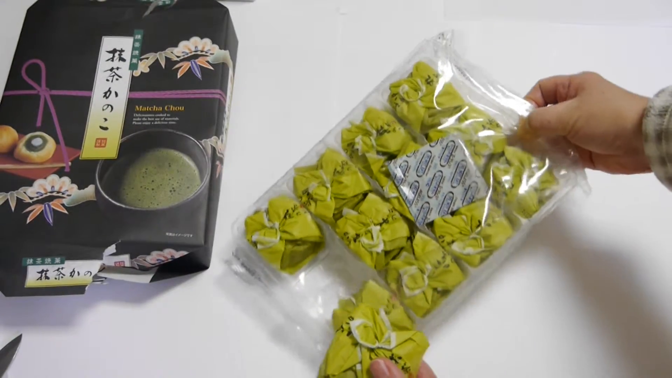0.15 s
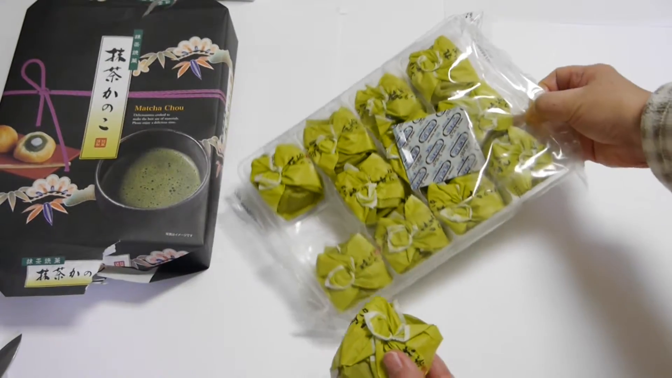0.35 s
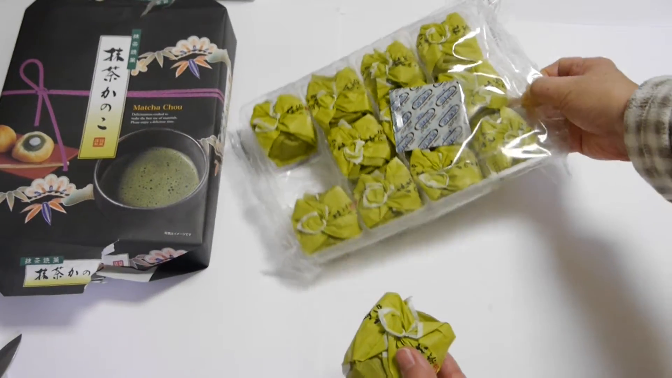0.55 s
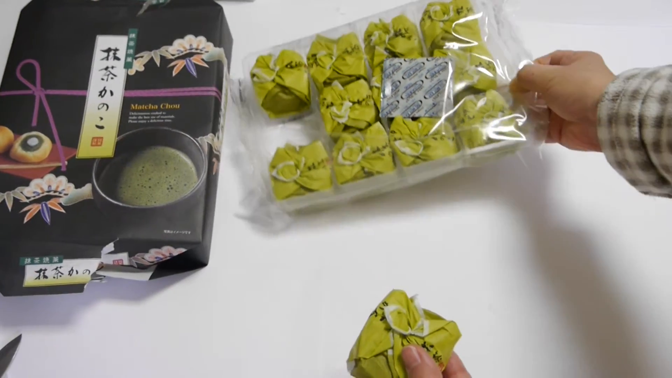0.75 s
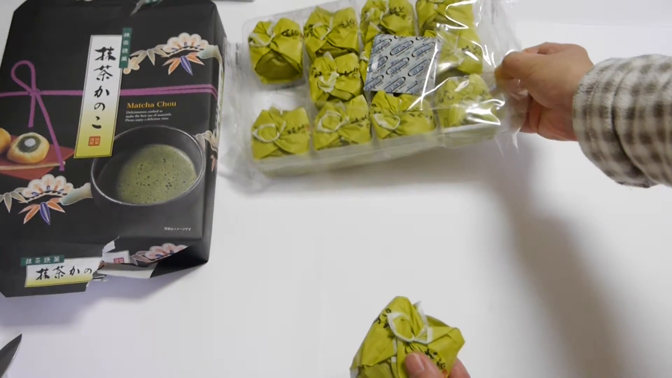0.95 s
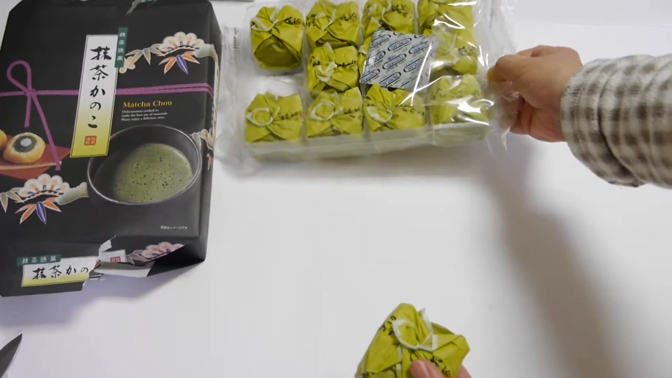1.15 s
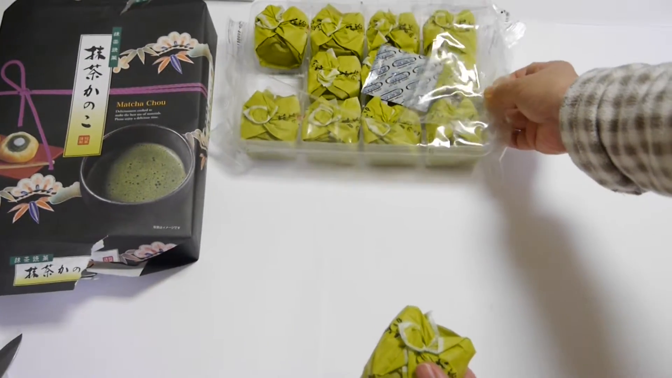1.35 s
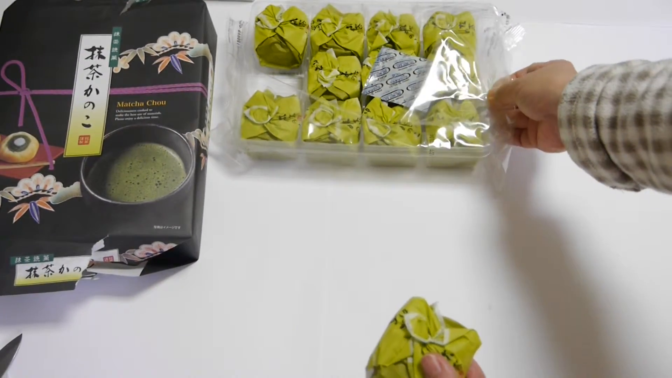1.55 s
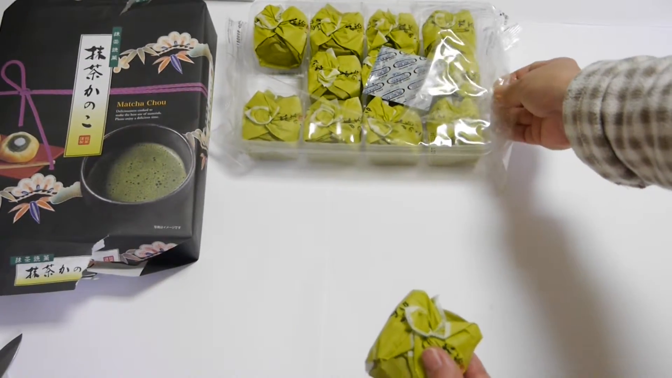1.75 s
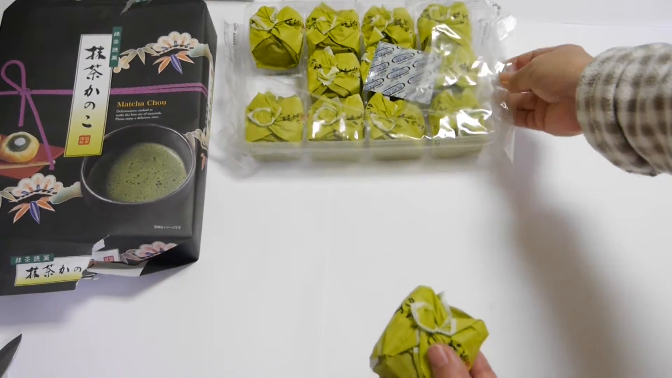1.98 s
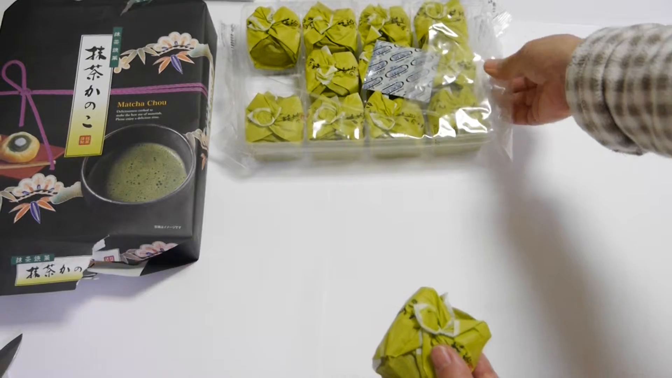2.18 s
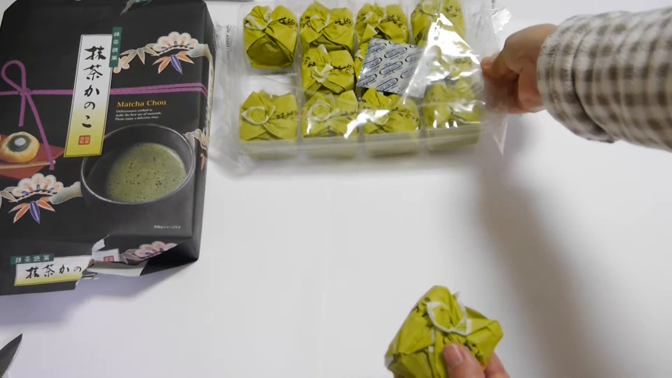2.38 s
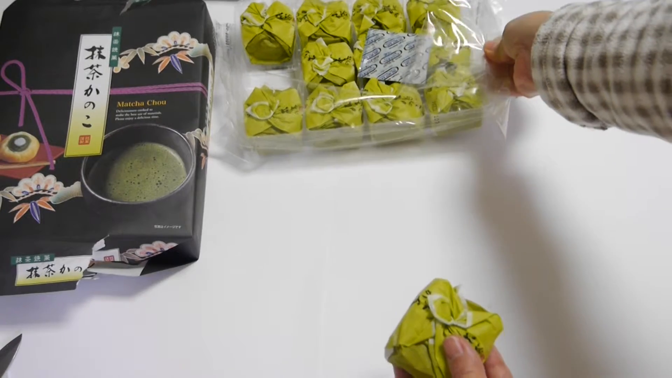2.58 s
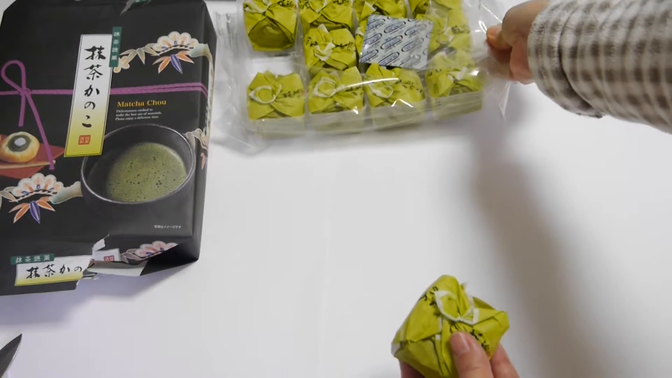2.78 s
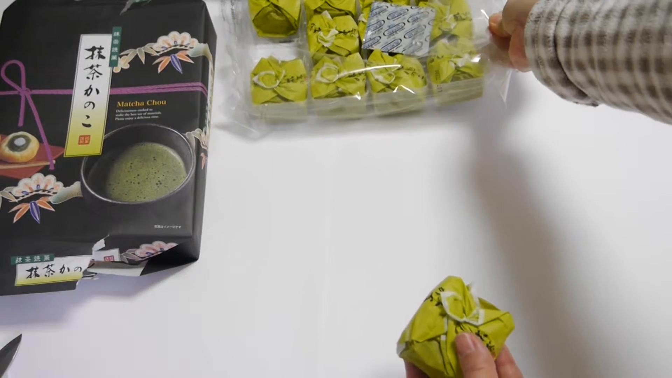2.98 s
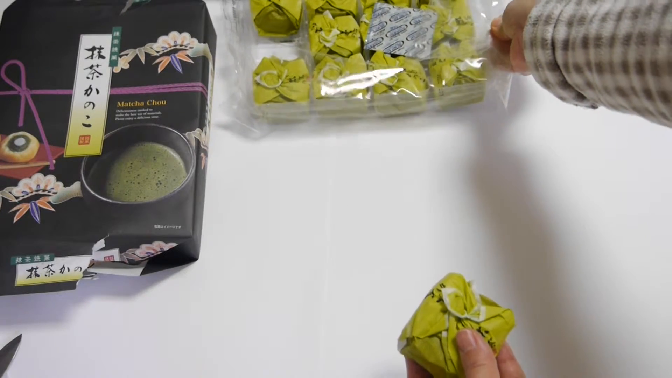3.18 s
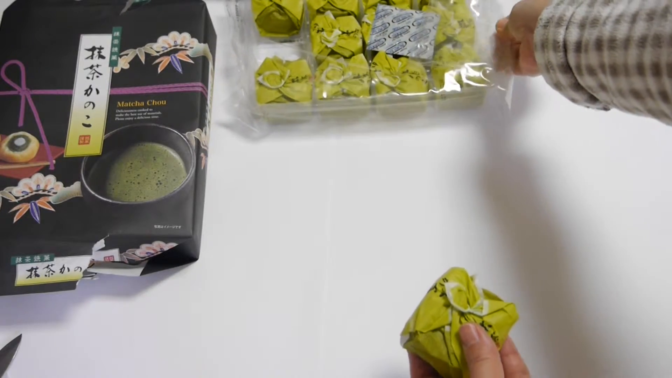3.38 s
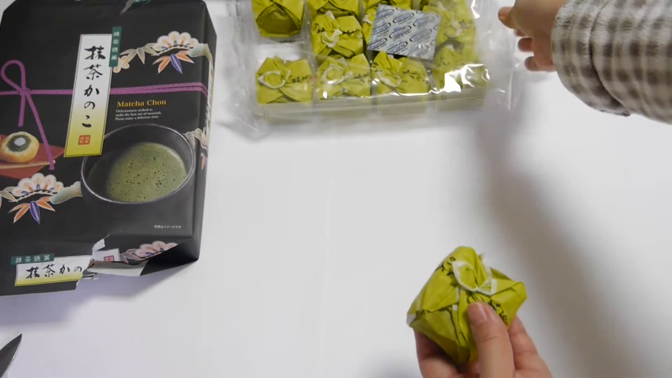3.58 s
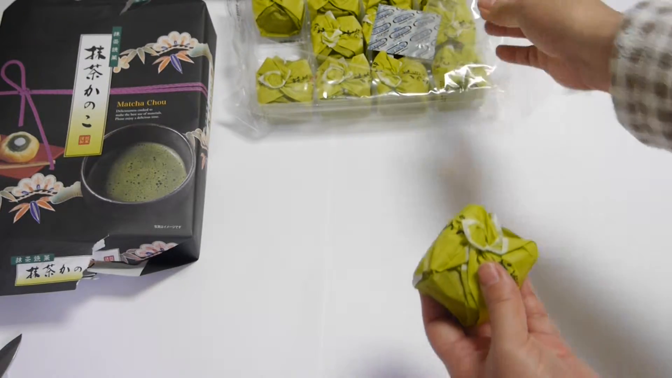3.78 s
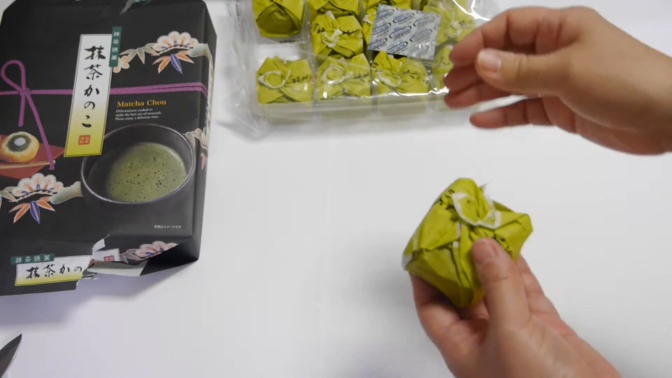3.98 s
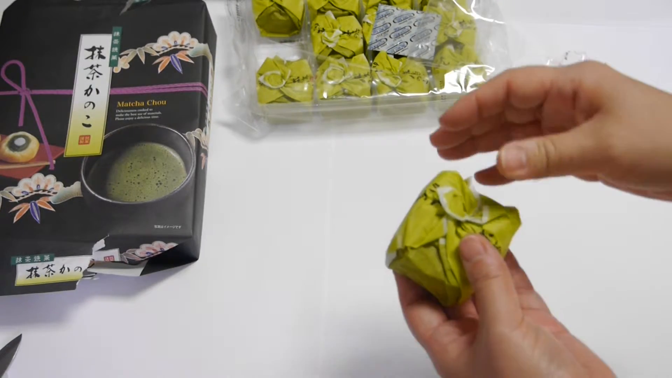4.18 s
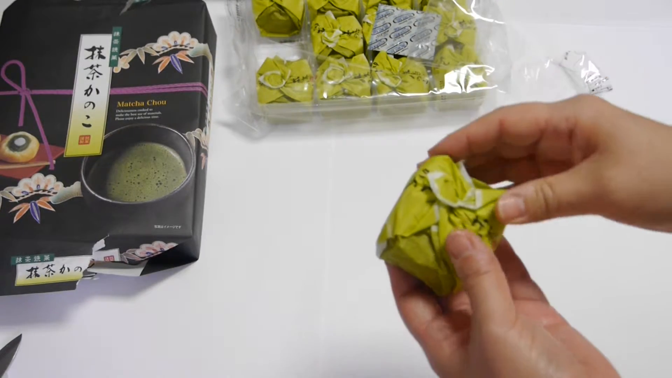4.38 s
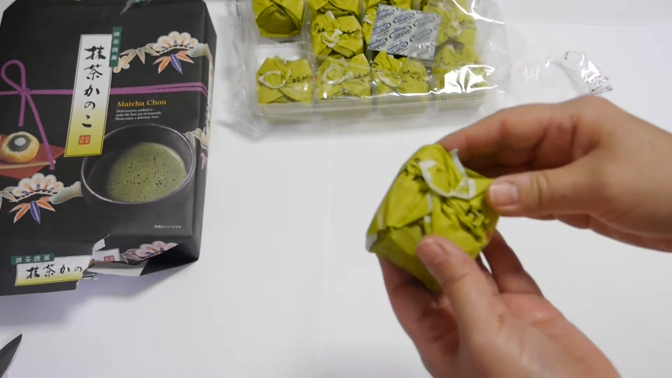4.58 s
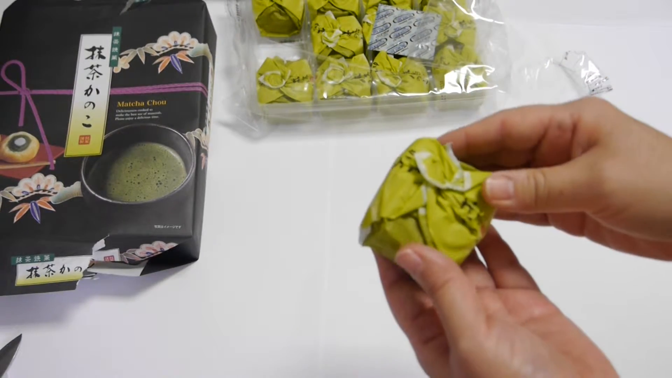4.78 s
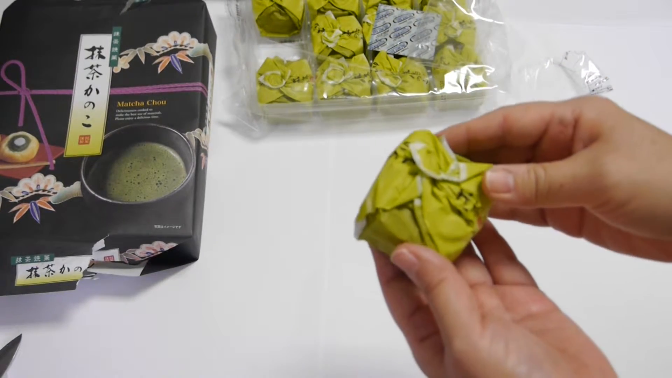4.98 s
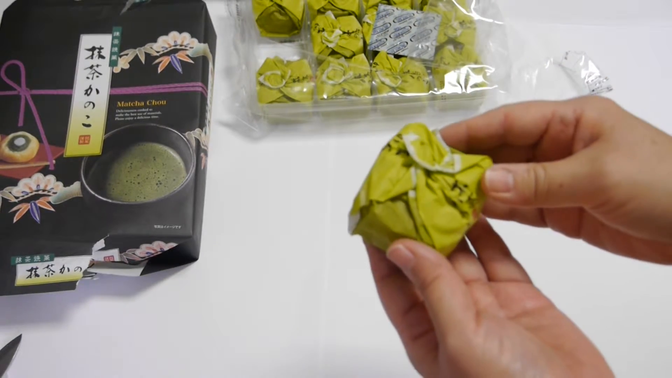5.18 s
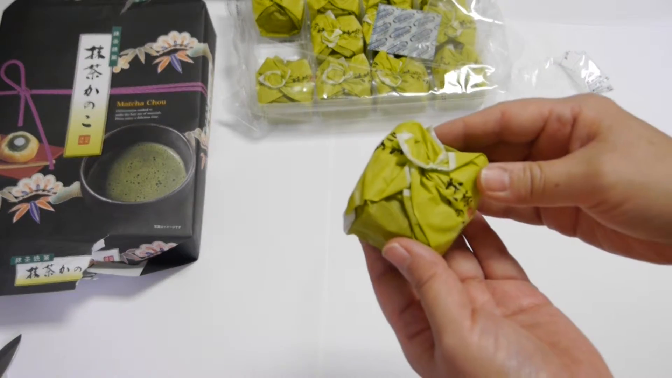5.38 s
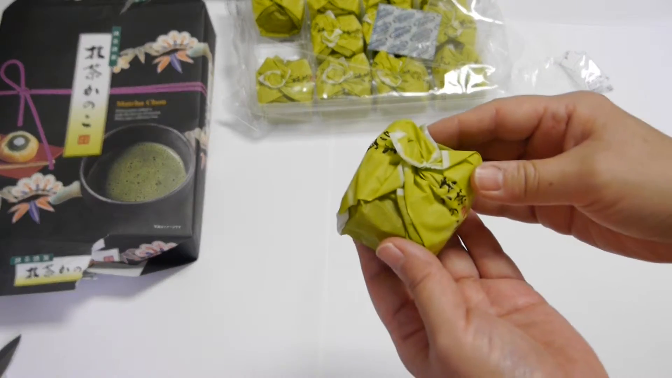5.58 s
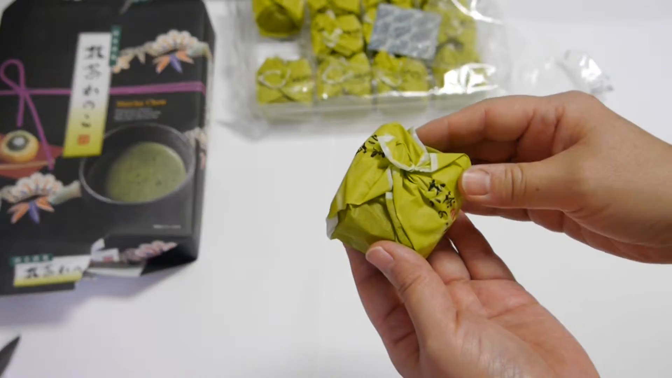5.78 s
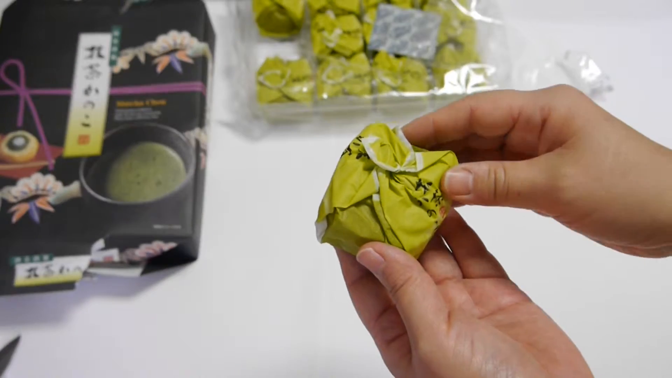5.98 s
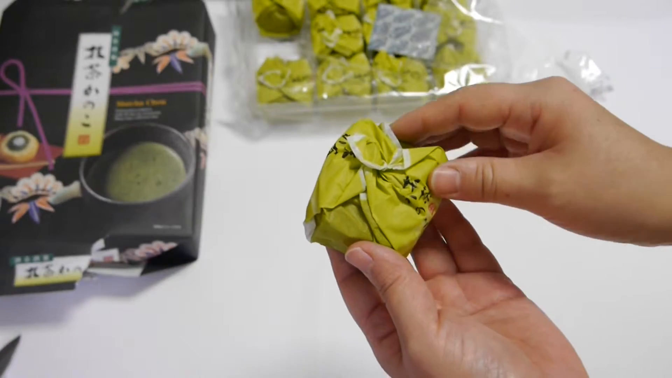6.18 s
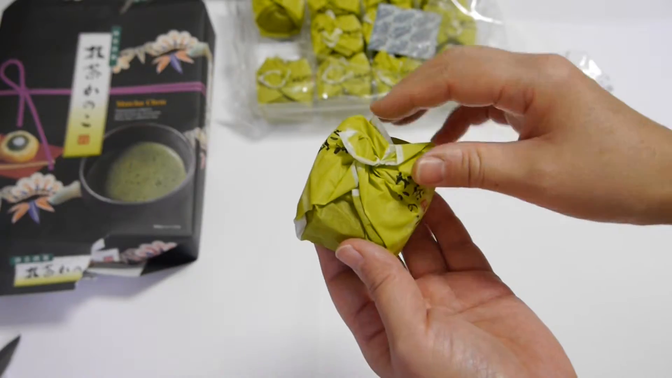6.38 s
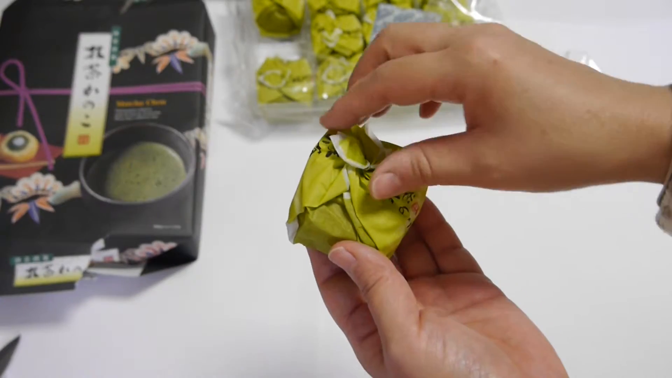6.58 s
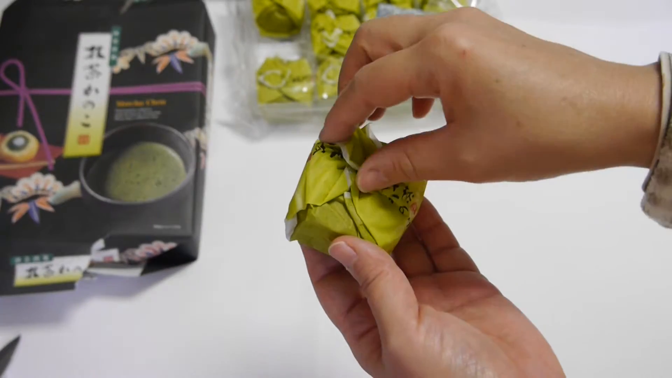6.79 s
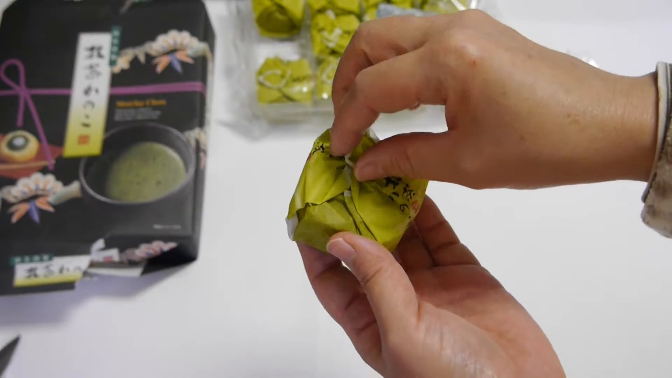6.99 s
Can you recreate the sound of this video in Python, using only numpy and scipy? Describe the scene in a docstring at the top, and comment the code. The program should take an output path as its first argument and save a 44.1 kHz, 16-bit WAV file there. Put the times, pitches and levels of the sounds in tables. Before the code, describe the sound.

A close stereo pickup in a small, slightly live room, with a soft low rush throughout. From 0 s a thin film bag on a plastic tray crackles finely, with one strong snap at 0.26. From 0.5 to 1.2 it slides over the table in two hissing swells, around 0.6 and 0.95, with dull hollow tray knocks near 0.6 and 1.1. A dense cluster of crackle, pops and knocks comes at 1.3-1.7. Scattered flexes and snaps follow, the sharpest at 2.76 with a tray knock, another at 2.84. Softer rustles and bumps run from 3.0 to 3.9, under a faint low hum swelling around 3-4. The bag is released near 3.9; a tiny bump comes at 4.2. Sparse, quiet wrapper crinkles occur at 4.5-5.3, then from 6.0, growing crisper and busier from 6.65 to the end. A barely audible thin whine fades in after 5.4.

```python
"""A hand stirs a thin film bag on a plastic tray of sweets, then pushes it across a table and lets go.
The film hisses as it slides, crackles as it flexes and snaps where a crease flips over; the hollow tray
knocks now and then. Later, fingers crinkle one wrapped sweet while a thin whine fades in.
Each film sound is a shower of tiny buckles, filtered; each snap or knock is a smeared click that rings.
A small room answers throughout over a low steady rush, and a faint hum swells midway.
"""
import sys
import numpy as np
from scipy import signal
from scipy.fft import rfft, irfft
from scipy.io import wavfile

SR = 44100
rng = np.random.default_rng(int(sys.argv[2]) if len(sys.argv) > 2 else 0)


def dump(signal):
    """Clip the signal to [-1, 1] and save it as 16-bit WAV at the path in sys.argv[1]."""
    limited = np.clip(np.atleast_2d(signal).T, -1, 1)
    pcm = np.round(limited * 32767).astype(np.int16)
    wavfile.write(sys.argv[1], SR, pcm)


N = 310905
TIME = np.arange(N) / SR

# The bag sliding across the table, before the layer balance: time_s, level_db
SLIDE_LEVEL = [(0.491, -64), (.515, -47.5), (.61, -44.5), (.72, -51), (.87, -52), (.9, -46), (.99, -45),
               (1.06, -51), (1.135, -50), (1.201, -72)]
# The hand flexing the bag, before the layer balance:
# start_s, length_s, wide_panel_level_db, small_facets_above_that_db
FLEXES = [(0, 0.13, -58, 6), (0.125, 0.41, -62.5, 13), (1.291, 0.1, -51, 9), (1.368, 0.15, -42, -3),
          (1.858, 0.14, -51.5, -2.5), (2.352, 0.17, -48, -3), (2.413, 0.023, -52.5, 12),
          (2.505, 0.18, -51.5, 0), (2.674, 0.43, -60, 8.5), (3.283, 0.21, -53.5, -11),
          (3.489, 0.14, -49.5, -6), (3.727, 0.15, -57.5, 8), (3.906, 0.1, -62.5, 2)]
# Relative spectra of the small facets, the wide panels and the dragging tray: frequency_hz, density_db_per_hz
FACET_SPECTRUM = [(1500, -25), (3000, -18.5), (4500, -9), (6500, 0), (8500, 0.5), (11000, -1.5),
                  (13000, -0.5), (16000, -7)]
PANEL_SPECTRUM = [(300, -40), (650, -9.5), (1000, 1.5), (1400, 2), (1900, -0.5), (2500, 0), (3700, -1.5),
                  (6000, -6.5), (12000, -33)]
DRAG_SPECTRUM = [(60, -32.5), (150, -9.5), (260, -3), (380, 0.5), (550, -1.5), (800, -2.5), (1300, -28.5),
                 (4000, -69)]
# Creases flipping over: start_s, panel_level_db, panel_pitch_hz, tick_level_db
SNAPS = [(.085, -16, 1370, -41), (0.185, -13, 2300, -31), (0.2597, 9, 1220, -9.5), (0.938, -8, 1740, -20),
         (1.123, -8.5, 1290, -18), (1.2843, -16, 397, -17), (1.331, -11.5, 3050, -23),
         (1.3522, -19, 4500, -15), (1.371, -7, 800, -11), (1.4049, 2.5, 796, -15), (1.435, -3, 570, -9.5),
         (1.4782, 3, 1010, -7), (1.4805, -9, 1000, -7.5), (1.559, -9, 1500, -15), (1.575, 1.5, 1480, -11.5),
         (1.6788, 9.5, 1450, -9), (1.8583, -6, 4800, -4.5), (1.9485, -8.5, 1420, -20),
         (2.0383, -12.5, 2950, -40), (2.2033, -29, 5200, -21), (2.3388, -6.5, 1500, -14.5),
         (2.4318, -10, 1400, -21), (2.4622, -4.5, 1110, -22), (2.541, -9.5, 1080, -19),
         (2.58, -7, 500, -10), (2.583, -5, 500, -14), (2.7187, -7.5, 1510, -19), (2.7573, 11, 670, -1),
         (2.8432, 5.5, 746, -8), (2.882, -12, 647, -13.5), (2.9528, -11.5, 1200, -37),
         (3.2334, -19, 2340, -42), (3.3327, -13, 2470, -22), (3.3864, -14, 1480, -27),
         (3.4361, -10, 1090, -15.5), (3.492, -6.5, 1500, -26), (3.5388, -12, 1400, -12.5),
         (3.5965, -13, 900, -15), (3.688, -14.5, 790, -24.5), (3.923, -10, 494, -23),
         (4.2555, -24, 500, -33.5), (4.585, -22, 3500, -34), (6.0372, -7, 1210, -15),
         (6.0772, -15, 1300, -30), (6.366, -7.5, 1230, -17.5), (6.455, -16.5, 4960, -26.5),
         (6.514, -21, 5000, -26), (6.64, -17.5, 2480, -34), (6.7724, -27, 4450, -39),
         (6.7969, -20, 3800, -14.5), (6.8032, -5, 4540, -18), (6.8544, -9.5, 500, -20),
         (6.8887, -22, 2300, -30), (7.01, -8, 1080, -19)]
# A flipping panel rings around its pitch and about an octave above: multiple_of_pitch, level_db
PANEL_RING = [(.1, -50), (.35, -19.5), (.65, -7.5), (.88, -0.5), (1.2, -1), (1.5, -8.5), (1.8, -2),
              (2.2, -5.5), (2.9, -11), (3.6, -12.5), (12, -46)]
# The tick of a crease: frequency_hz, level_db
TICK_SPECTRUM = [(40, -28), (130, -3), (500, -3.5), (1800, -2.5), (4000, 1), (6300, 2), (10500, 2.5),
                 (16000, -12.5)]
# The tray bumping and buckling, before the overall trim: start_s, level_db, pitch_hz, scuff_spread_s
KNOCKS = [(.601, -10, 1310, .008), (.647, -9.5, 1140, 0.0044), (0.652, -16, 433, 0.0067),
          (1.102, -18.5, 480, 0.015), (1.17, -21.5, 506, .025), (1.273, -22.5, 430, .01),
          (1.3086, -16, 710, 0.0014), (1.323, -19, 553, .002), (1.424, -6, 1240, .004),
          (1.440, -11, 594, .01), (1.466, -12.5, 1410, 0.00148), (1.467, -12, 500, 0.00306),
          (2.248, -22.5, 330, .025), (2.62, -27.5, 170, .015), (2.759, -11.5, 304, 0.0012),
          (3.045, -13.5, 690, 0.00281), (3.053, -10.5, 575, .006), (3.11, -26, 533, .0027),
          (3.601, -23.5, 194, 0.0075), (3.805, -19, 730, 0.0084), (3.862, -27.5, 320, 0.0045),
          (4.226, -27, 330, .0032)]
# Modes of the hollow tray: frequency_hz, width_hz, relative_level_db
TRAY_MODES = [(293, 53, -35), (427, 27, 6), (526, 68, 9), (639, 37, 3), (868, 28, -7.5), (1072, 270, 1),
              (1260, 76, -14), (1490, 26, -3.5)]
# Fingers pinching the wrapper, before the overall trim: start_s, length_s, level_db
PINCHES = [(4.51, 0.17, -56), (4.697, 0.1, -58.5), (4.88, 0.15, -61.5), (5.156, 0.14, -61.5),
           (6.02, 0.36, -64.5), (6.35, 0.089, -52), (6.435, 0.11, -53.5), (6.652, 0.061, -46),
           (6.7, 0.62, -51.5), (6.804, 0.068, -50), (6.918, 0.065, -45), (7.008, 0.098, -51)]
# Relative spectrum of the wrapper: frequency_hz, density_db_per_hz
WRAPPER_SPECTRUM = [(300, -29), (900, 6), (1500, -3), (2600, 0), (4000, 1), (6000, -0.5), (8000, 2.5),
                    (11000, -0.5), (13500, 3), (16000, -5)]
# The room's decay: frequency_hz, t60_s
ROOM_DECAY = [(200, 0.45), (800, 0.31), (2100, 0.33), (5500, 0.28), (10000, 0.3), (15000, 0.26)]
# Side level of the reflections: frequency_hz, level_db
ROOM_WIDTH = [(100, -8), (500, -7.5), (1200, -4.5), (5000, -6), (10000, -2)]
# Relative spectra of the room tone, common to both ears and opposed: frequency_hz, density_db_per_hz
TONE_MID = [(15, -40), (25, -20.5), (87, -7), (166, -5.5), (317, -2.5), (394, -3), (503, -8.5), (591, -9),
            (695, -12.5), (1700, -18.5), (2220, -22.5), (16000, -28)]
TONE_SIDE = [(15, -61), (25, -20), (111, -16), (195, -9.5), (270, -8.5), (887, -4.5), (1260, -6.5),
             (1650, -8), (2220, -14), (16000, -31.5)]
# Level of the room tone, before the mid and side balance: time_s, level_db
TONE_LEVEL = [(0, -56), (4.2, -58), (4.8, -57), (5.6, -59), (6.3, -58.5)]
# A faint low hum that swells for a while: time_s, level_db
HUM_LEVEL = [(2.5, -85), (2.9, -63.5), (3.6, -65), (4.3, -81)]
# A faint whine, one row: start_s, length_s, pitch_hz, peak_level_db
WHINE = (5.35, 4, 1690, -79)
# Microphone colour: frequency_hz, level_db
MIC_COLOUR = [(6000, -2.5), (8300, -5), (10300, 1.5), (12000, -5), (16000, -9)]
# Left minus right: frequency_hz, difference_db
MIC_LEAN = [(3000, -0.1), (8000, 0), (10500, -0.5), (13000, -4.5)]

HUM_HZ, EDGE_HZ = 76.5, 16100
LARGEST_BUCKLE_DB = 13  # above the smallest
LET_GO_S, TAKE_HOLD_S = 3.93, 4  # the hand starts to leave the bag; it takes the wrapped sweet


def slide(facets_db=2.0, panels_db=1.5, drag_db=-12, smooth=0.72):
    """The sliding bag hisses in its small facets and wide panels; the tray drags beneath."""
    times, levels_db = np.transpose(SLIDE_LEVEL)
    speed = amp(np.interp(TIME, times, levels_db, -np.inf, -np.inf))  # silent outside the slide
    facets = amp(facets_db) * rustle(FACET_SPECTRUM, smooth)
    panels = amp(panels_db) * rustle(PANEL_SPECTRUM, smooth)
    return speed * (facets + panels + amp(drag_db) * dragging())


def bag(facets_db=-2, panels_db=-1, drag_db=-4, held_facets_db=-66, held_panels_db=-63,
        held_drag_db=-61, release_s=0.083, smooth=0.72):
    """The bag stirs steadily while held; each flex makes it crackle and shifts the tray."""
    held = np.clip((LET_GO_S - TIME) / release_s + 1, 0, 1)
    wide = sum(amp(db) * swell(s, length) for s, length, db, _ in FLEXES)
    fine = sum(amp(db + bright_db) * swell(s, length) for s, length, db, bright_db in FLEXES)
    facet_level = np.hypot(amp(facets_db) * fine, amp(held_facets_db) * held)
    panel_level = np.hypot(amp(panels_db) * wide, amp(held_panels_db) * held)
    drag_level = np.hypot(amp(drag_db) * wide, amp(held_drag_db) * held)
    facets = facet_level * rustle(FACET_SPECTRUM, smooth)
    panels = panel_level * rustle(PANEL_SPECTRUM, smooth)
    return facets + panels + drag_level * dragging()


def rustle(spectrum, smooth, uneven_db=4, dwell_s=.02, count=16):
    """Sparse buckles and dense friction wander between patches of film that each ring differently."""
    buckles = crackle(per_s=380, size_db=5.5)
    friction = crackle(per_s=4000, size_db=5)
    drive = np.sqrt(1 - smooth) * buckles + np.sqrt(smooth) * friction
    hz = np.geomspace(200, 17000, 48)
    click = signal.unit_impulse(512)
    resonances_db = uneven_db * rng.standard_normal((count, len(hz)))
    resonances_db -= resonances_db.mean(0)
    patches = [colour(click, list(zip(hz, db))) for db in read(spectrum, hz) + resonances_db]
    out, step = np.zeros(N), round(dwell_s * SR)
    for i in range(0, N, step):
        patch = patches[rng.integers(count)]
        add(out, i / SR, np.convolve(drive[i:i + step], patch))
    return evened(out)


def crackle(per_s, size_db):
    """Tiny buckles at random moments: many small, a few large."""
    size = amp(np.minimum(size_db * rng.exponential(1, N), LARGEST_BUCKLE_DB))
    happens = rng.random(N) < per_s / SR
    return evened(size * rng.choice([-1, 1], N) * happens)


def dragging():
    """The tray scrapes low on the table in many small slips."""
    return evened(colour(crackle(per_s=900, size_db=3.5), DRAG_SPECTRUM))


def swell(start, length, arch=0.5):
    """An effort that rises and falls in an arch, as in one push of the hand."""
    phase = np.clip((TIME - start) / length, 0, 1)
    return (4 * phase * (1 - phase)) ** arch


def snaps(crack_s=0.000504, flutter_s=0.0027, flutter_db=-8):
    """A crease flips in about a millisecond with a tick; its panel rings and flutters briefly."""
    out, hz = np.zeros(N), np.linspace(20, 20000, 800)
    for s, panel_db, pitch_hz, tick_db in SNAPS:
        crack = burst(crack_s)
        t = np.arange(len(crack)) / SR
        flutter = unit(rng.standard_normal(len(t)) * np.exp(-t / flutter_s))
        ring_db = read([(multiple * pitch_hz, db) for multiple, db in PANEL_RING], hz)
        panel = amp(panel_db + ring_db)
        tick = amp(tick_db + read(TICK_SPECTRUM, hz))
        gain = np.hypot(panel, tick)
        snap = colour(crack + amp(flutter_db) * flutter, list(zip(hz, 20 * np.log10(gain))))
        add(out, s, np.sqrt(np.mean(gain ** 2)) * unit(snap))
    return out


def burst(spread_s, size=8192):
    """A click of even spectrum whose pitches leave the plastic at scattered moments, as bending waves do."""
    hz = np.fft.rfftfreq(size, 1 / SR)
    lags = rng.exponential(1, size // 4)
    delay = spread_s * np.interp(2 * hz * spread_s, np.arange(len(lags)), lags)
    phase = -2 * np.pi * np.cumsum(delay) * hz[1]  # delay is the slope of phase over frequency
    click = irfft(np.exp(1j * phase), size)
    return np.roll(click, 20)[:size // 2]  # a short lead-in holds the start of its front


def knocks(level_db=-1, ring_db=-3, span=1.455):
    """Each bump is a dull scuff, heard directly and through the tray's modes."""
    out = np.zeros(N)
    for s, db, hz, spread_s in KNOCKS:
        scuff = unit(band(burst(spread_s), hz / span, hz * span))
        ring = unit(tray(scuff))
        add(out, s, amp(db + level_db) * (scuff + amp(ring_db) * ring))
    return out


def tray(force):
    """A force sets off the tray's modes; the wider a mode, the faster it dies."""
    t = np.arange(SR // 16) / SR
    ring = sum(amp(db) * np.exp(-np.pi * width * t) * np.sin(2 * np.pi * hz * t)
               for hz, width, db in TRAY_MODES)
    return signal.oaconvolve(force, ring)[:len(force)]


def wrapper(level_db=-2, held_db=-72, smooth=0.56):
    """The sweet's wrapper stirs faintly in the fingers and crinkles at each pinch."""
    effort = sum(amp(db + level_db) * swell(s, length) for s, length, db in PINCHES)
    held = amp(held_db) * (TIME > TAKE_HOLD_S)
    return np.hypot(effort, held) * rustle(WRAPPER_SPECTRUM, smooth)


def room(x, wet_db=-2.0, near_db=-2, shift_s=.031, count=7):
    """Echo patterns crossfade in turn, like shifting parts of the film; the nearer wrapper is drier."""
    send = x * amp(wet_db + near_db * (TIME > 4.2))
    mid, side = np.zeros((2, N))
    for k in range(count):
        away = abs((TIME / shift_s - k + count / 2) % count - count / 2)  # turns from this pattern's own
        part = send * np.cos(np.pi / 2 * np.minimum(away, 1))
        common, opposed = (signal.oaconvolve(part, unit(tail))[:N] for tail in reflections())
        mid, side = mid + common, side + opposed
    side = colour(side, ROOM_WIDTH)
    return np.array([mid + side, mid - side])


def reflections(early_db=4, early_s=0.01, gap_s=0.0024):
    """Dense mid and side echoes, strongest early from the table and the box; each band dies at its own speed."""
    size = SR * 2 // 3
    t = np.arange(size) / SR
    taps = rng.choice([-1, 1], (2, size)) * (rng.random((2, size)) < 4000 / SR)  # 4000 echoes a second
    taps = taps * (t > gap_s) * amp(early_db * np.exp(-t / early_s))
    hz, age, z = signal.stft(taps, SR, nperseg=256)
    decay = amp(-60 * age / read(ROOM_DECAY, hz)[:, None])
    return signal.istft(z * decay, SR, nperseg=256)[1]


def room_tone(mid_db=1.5, side_db=3, waver=0.56):
    """A wide steady rush with a little hiss, and a hum that wavers in level and phase."""
    mid = amp(mid_db) * rush(TONE_MID)
    side = amp(side_db) * rush(TONE_SIDE)
    drift = rush([(5, 0), (15, -100)])  # slow wander, mostly below 5 Hz
    hum = evened((1 + waver * drift) * np.sin(2 * np.pi * HUM_HZ * TIME + drift))
    wide = np.array([mid + side, mid - side])
    return amp(curve(TONE_LEVEL)) * wide + amp(curve(HUM_LEVEL)) * hum


def rush(points):
    """Steady noise with the given spectrum."""
    gain = amp(read(points, np.fft.rfftfreq(N, 1 / SR)))
    return evened(irfft(rfft(rng.standard_normal(N)) * gain, N))


def whine():
    """A thin sine tone that fades in and is still rising at the end."""
    start, length, hz, db = WHINE
    return amp(db) * swell(start, length) * np.sin(2 * np.pi * hz * TIME)


def amp(db):
    """Decibels to amplitude."""
    return 10 ** (np.asarray(db) / 20)


def evened(x):
    """Scales a sound to an RMS level of one."""
    return x / np.sqrt(np.mean(x ** 2) + 1e-20)


def unit(x):
    """Scales a sound to an energy of one."""
    return x / np.sqrt(np.sum(x ** 2) + 1e-20)


def read(points, hz):
    """A spectrum's value at hz, along a log axis."""
    f, value = np.transpose(points)
    return np.interp(np.log(hz + 1), np.log(f + 1), value)


def curve(rows):
    """A time table's value at every sample."""
    return np.interp(TIME, *np.transpose(rows))


def add(mix, s, sound):
    """Lays a sound into the mix at s seconds, cut off at the end."""
    part = mix[max(round(s * SR), 0):][:len(sound)]
    part += sound[:len(part)]


def colour(x, points, size=2048):
    """Causal minimum-phase filter with the given spectrum, so that clicks keep their sharp fronts."""
    log_gain = np.log(amp(read(points, abs(np.fft.fftfreq(size, 1 / SR)))))
    taps = np.fft.ifft(np.exp(np.conj(signal.hilbert(log_gain)))).real
    return signal.oaconvolve(x, taps[:size // 2])[:len(x)]


def band(x, lo_hz, hi_hz):
    """Gentle band-pass filter."""
    return signal.sosfilt(signal.butter(2, [lo_hz, hi_hz], "band", fs=SR, output="sos"), x)


def scene():
    """Film, tray and wrapper in the centre, with the room, its tone and the whine around them."""
    direct = snaps() + knocks() + slide() + bag() + wrapper()
    return direct + room(direct) + room_tone() + whine()


def record(dry):
    """A close stereo microphone: a treble peak, a brighter right side and a band limit."""
    sides = []
    for x, sign in zip(dry, (1, -1)):
        lean = [(hz, sign * db / 2) for hz, db in MIC_LEAN]
        sides.append(colour(colour(x, MIC_COLOUR), lean))
    low_pass = signal.firwin(301, EDGE_HZ, window=("kaiser", 8), fs=SR)
    return signal.oaconvolve(np.array(sides), low_pass[None], "same", axes=1)


dry = scene()
out = record(dry)
dump(out)
```